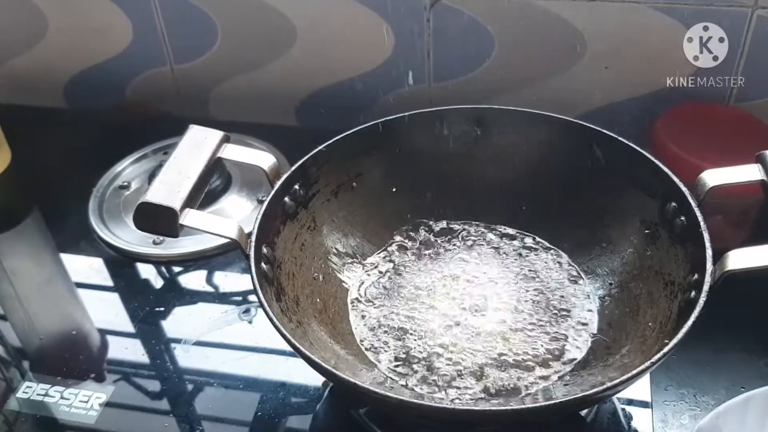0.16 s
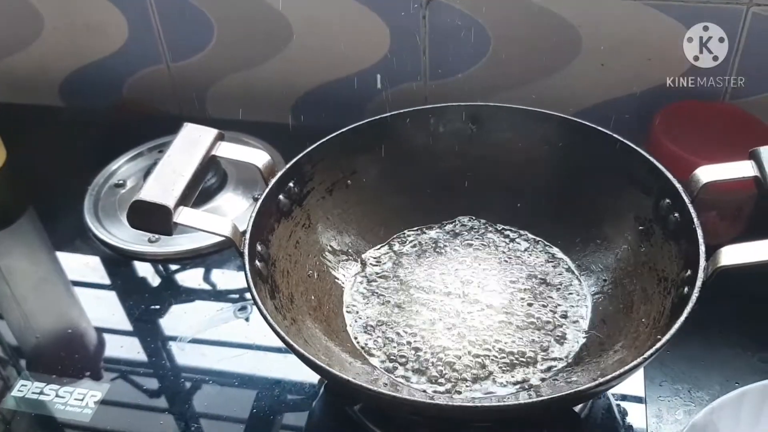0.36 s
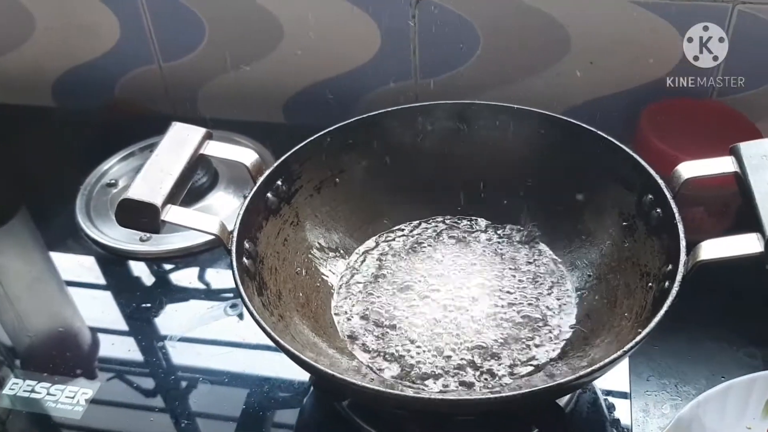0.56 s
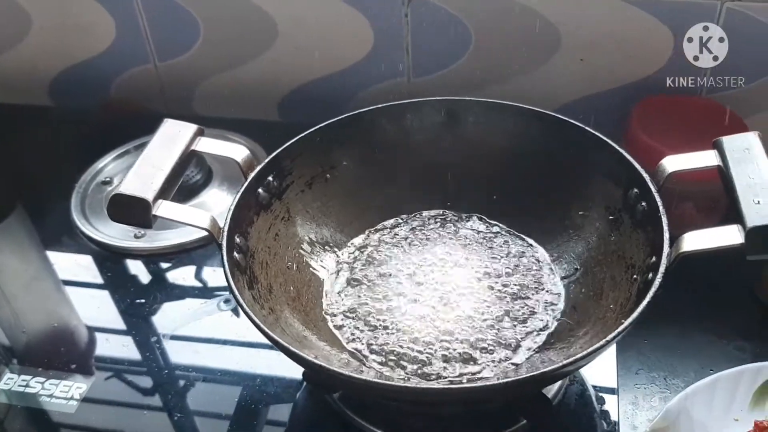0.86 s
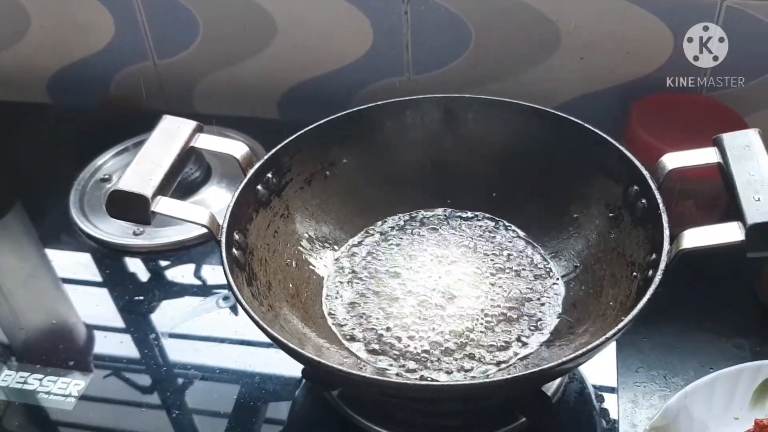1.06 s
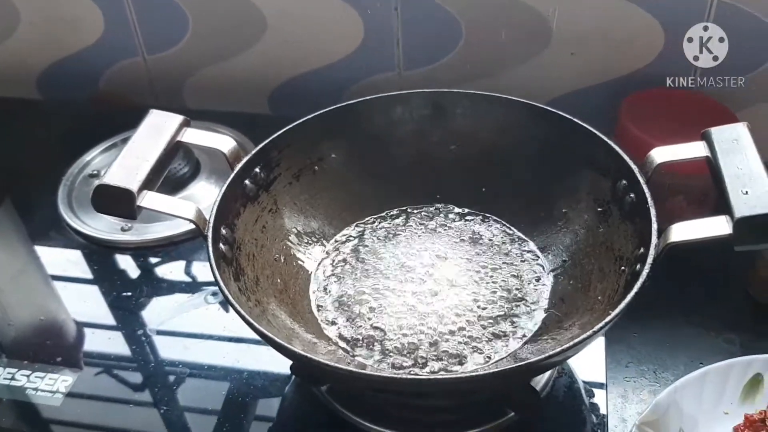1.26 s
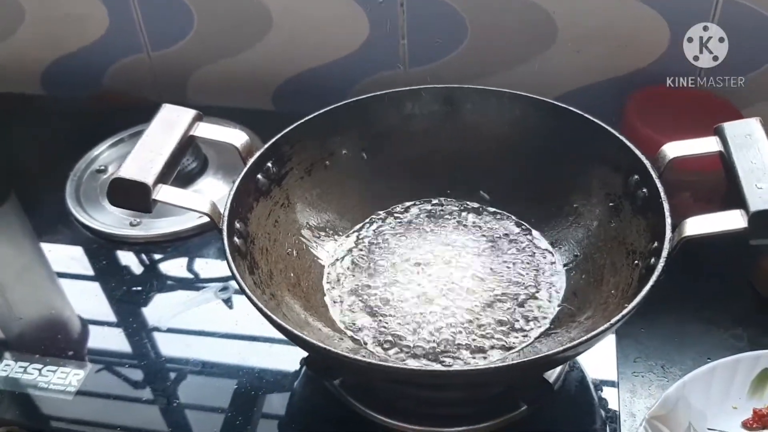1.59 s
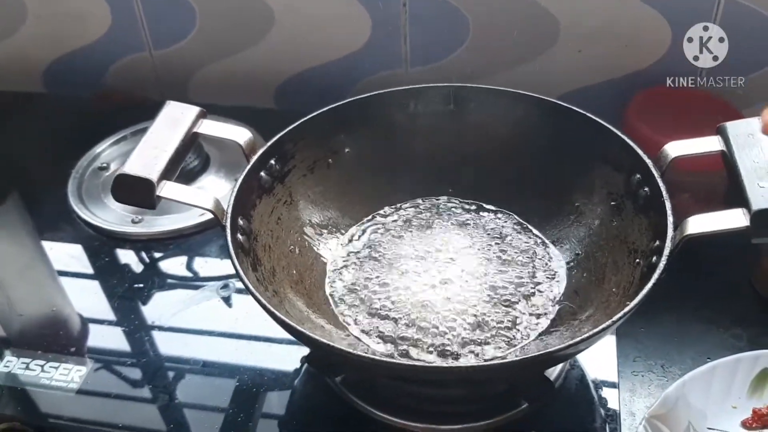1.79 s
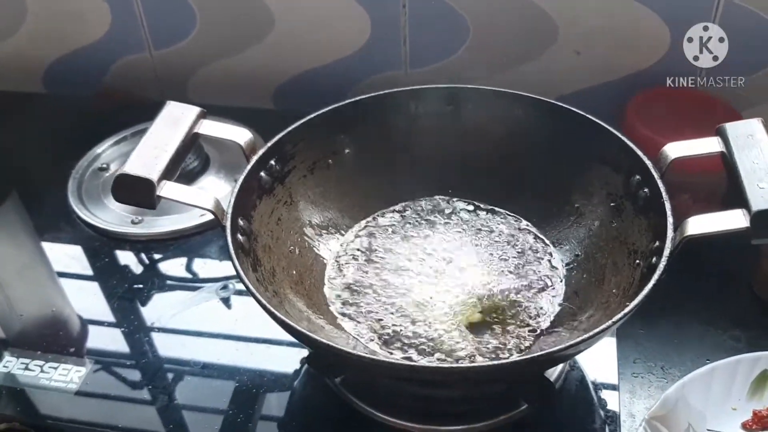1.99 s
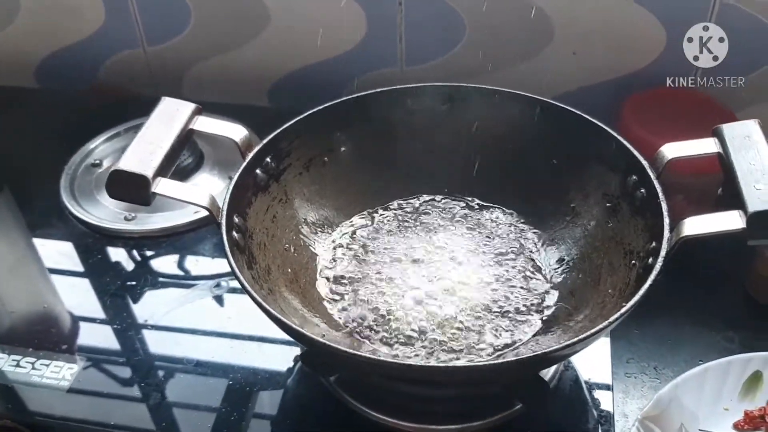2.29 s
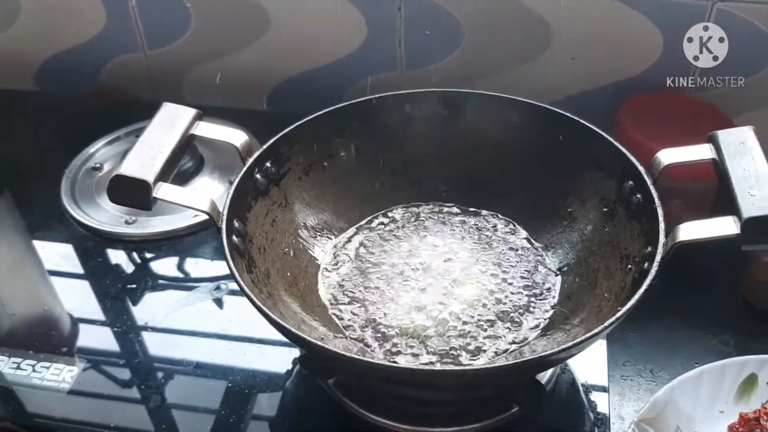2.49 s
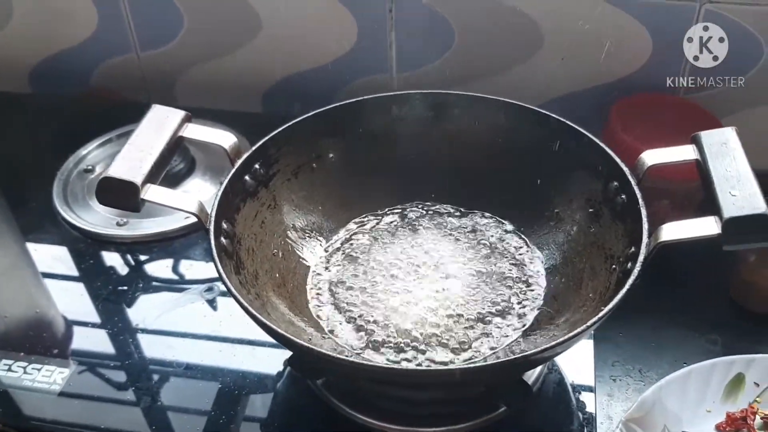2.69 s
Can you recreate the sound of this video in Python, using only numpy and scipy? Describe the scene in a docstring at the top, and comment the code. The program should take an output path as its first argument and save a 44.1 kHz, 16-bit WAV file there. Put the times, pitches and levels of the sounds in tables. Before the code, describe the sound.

Oil sizzles and bubbles in a steel wok close to the microphone, crackling with scattered sharp snaps from start to finish. A gas flame rushes very faintly underneath in a small, slightly echoing kitchen.

```python
"""Hot oil sizzles in a steel wok on a gas ring, heard from close above in a tiled kitchen.
Trapped water flashes to steam in sharp snaps; steam bubbles tear open and resonate for a few cycles,
and countless smaller ones merge into a fizz. Each snap and pop scatters in the bowl and reverberates
in the room, and three hard snaps jolt the microphone. The flame rushes faintly underneath."""
import sys
import numpy as np
from scipy import signal
from scipy.fft import rfft, irfft, next_fast_len
from scipy.io import wavfile

SR = 44100
rng = np.random.default_rng(int(sys.argv[2]) if len(sys.argv) > 2 else 0)


def unload_audio(sound):
    """Save the sound as a 16-bit wav file, at the path given as the first command line argument."""
    columns = np.transpose(np.atleast_2d(sound))
    # keep every value between -1 and 1, then stretch to whole-number steps
    steps = np.round(np.clip(columns, -1, 1) * 32767)
    wavfile.write(sys.argv[1], SR, steps.astype(np.int16))


N = 125685
GRAIN = 1024  # samples in one burst
TREBLE_HZ = 7040
FIZZ_PAN_DB = 1.5


def from_db(db):
    """Amplitude ratio of a level in decibels."""
    return 10 ** (np.asarray(db) / 20)


def rms_one(x):
    """Normalisation to unit mean power."""
    return x / np.sqrt(np.mean(x ** 2) + 1e-20)


def panned(db):
    """Direction by level difference: gains that put the left channel db above the right."""
    return from_db(np.array([[.5], [-.5]]) * db)


def add(out, s, sound):
    """Superposition: a sound joins the mix at s seconds."""
    i = int(np.clip(s * SR, 0, N - 1))
    out[:, i:i + sound.shape[-1]] += sound[..., :N - i]


def gain_at(colour, hz):
    """Spectral envelope, interpolated in decibels over log frequency."""
    corner_hz, db = np.transpose(colour)
    return from_db(np.interp(np.log(hz + 1), np.log(corner_hz), db))


def bins(size):
    """Frequencies in Hz of a real Fourier transform."""
    return np.arange(size // 2 + 1) * SR / size


def minimum_phase(gain):
    """Folding the cepstrum gives the most compact causal click with this spectrum."""
    cepstrum = irfft(np.log(gain + 1e-6))
    half = len(cepstrum) // 2
    cepstrum[1:half] *= 2
    cepstrum[half + 1:] = 0
    return irfft(np.exp(rfft(cepstrum)))


def noise(colour, correlation):
    """Partly coherent stereo noise of unit power, mixed from a common and an opposed part."""
    size = 2 * next_fast_len(N // 2 + 1)
    white = rng.standard_normal((2, size))
    mid, side = irfft(rfft(white) * gain_at(colour, bins(size)))[:, :N]
    return rms_one(np.sqrt(1 + correlation) * mid + np.sqrt(1 - correlation) * side * [[1], [-1]])


def swarm(per_s, spread_db=4.5, range_db=14.5):
    """Independent bursts, mostly weak. Each row: start in seconds, extra dB, pitch deviation."""
    draws = rng.random((int(per_s * N / SR), 4))
    extra_db = np.minimum(-spread_db * np.log(draws[:, 1]), range_db)
    deviation = (draws[:, 2] - draws[:, 3]) * np.sqrt(6)  # triangular, unit variance
    return zip(draws[:, 0] * N / SR, extra_db, deviation)


def vigour_db(s, follow=0.25):
    """A harder boil radiates more: the level follows a fraction of its swing about the mean."""
    # Vigour of the boil. Each row: time in seconds, vigour in dB.
    boil = [(0.0, -41.5), (.66, -38.5), (1.14, -46.5), (1.25, -44), (1.98, -45), (2.11, -32.5),
            (2.36, -46.5)]
    times, db = np.transpose(boil)
    return follow * (np.interp(s, times, db) - db.mean())


def fizz(level_db=-52, flicker_db=5, flickers_per_s=90):
    """Bubbles too small and many to tell apart sum incoherently to a flickering noise."""
    # Spectrum of the fizz. Each row: frequency in Hz, level in dB.
    colour = [(300, -32), (650, -5), (900, -10), (1300, 1.5), (1850, -2), (2400, 4), (3000, 3.5),
              (4200, 3.5), (5800, -3.5), (7200, -5.5), (10000, -18), (15000, -16), (16000, -58)]
    t = np.arange(N) / SR
    flicker = np.interp(t * flickers_per_s, np.arange(N), rng.standard_normal(N))
    envelope = from_db(level_db + vigour_db(t) + flicker_db * flicker)
    return envelope * noise(colour, correlation=0.49) * panned(FIZZ_PAN_DB)


def flame(level_db=-62):
    """The gas flame radiates a steady broadband rush, strongest at low frequencies."""
    # Spectrum of the flame. Each row: frequency in Hz, level in dB.
    colour = [(25, -41), (50, -35), (80, -7), (125, 2.5), (220, -2.5), (420, 3.5), (590, -2), (850, 3),
              (2000, -15.5)]
    return from_db(level_db) * noise(colour, correlation=0.82) * panned(db=1)


def pop(db, hz, rise_cycles, crack_db):
    """Damped cavity resonance: the film tears with a click, and the ring swells and dies away."""
    # Spectrum of the tearing film. Each row: frequency in Hz, level in dB.
    crack_colour = [(300, -57), (950, 4), (1600, -28), (4000, 2.5), (7000, 5), (15000, -11)]
    crack = minimum_phase(gain_at(crack_colour, bins(GRAIN)))
    cycles = np.arange(GRAIN) / SR * hz
    age = cycles / rise_cycles
    ring = (age * np.exp(1 - age)) ** 2 * np.sin(2 * np.pi * cycles)
    return from_db(db) * (ring + from_db(crack_db) * crack)


def bubbles(small_hz=4040, low_hz=1035, mic_move_db_per_s=3):
    """Steam cavities resonate as large pops, a crowd of small ones and a low bubbling near 1 kHz."""
    # Large bubbles. Each row: start in seconds, level in dB, pitch in Hz, cycles to the top of
    # the ring (under 1 a dry crack, 2 a round plip).
    pops = [(.0070, -25, 2646, 0.78), (0.1118, -24, 3140, 1.2), (.1234, -17.5, 4670, 1.6),
            (.1340, -30.5, 2270, 2.9), (.1640, -26.5, 3200, 3.9), (0.167, -30.5, 1550, 2.2),
            (.1697, -27, 3120, 2.8), (.1701, -18.5, 4470, 2.3), (0.1803, -22, 5000, 1.9),
            (0.1793, -24, 2530, 1.9), (0.2164, -24, 4020, 1.3), (.2356, -18, 3270, 1.8),
            (0.2397, -16.5, 3080, 1.23), (0.2579, -16, 2970, 1.5), (0.2656, -25.5, 4500, 3),
            (0.2698, -17, 2843, 0.69), (0.3523, -27, 2690, 2.4), (.4690, -19, 3283, 1.25),
            (.5358, -25, 3656, 0.66), (.5634, -32, 4030, 1.6), (0.6014, -18.5, 3180, 1.34),
            (0.7064, -23, 5700, 1.2), (0.8381, -22, 2130, 1.5), (.8648, -26, 3400, 2.3),
            (.8801, -19.5, 3030, 2.1), (1.0417, -20.5, 3120, 1.45), (1.0700, -16.5, 3030, 1.6),
            (1.1317, -28, 3380, 1.9), (1.1786, -20.5, 3929, 1.5), (1.264, -32, 4300, 3.7),
            (1.2992, -29.5, 2700, 1.15), (1.3322, -23, 2900, 0.82), (1.5306, -21.5, 3430, 0.82),
            (1.6127, -19.5, 2940, 1.13), (1.6198, -18.5, 2930, 0.6), (1.6447, -18, 3850, 1.15),
            (1.7188, -17.5, 3840, 0.49), (1.9063, -36, 3420, 3), (1.9390, -23, 2910, 1.02),
            (1.9897, -18.5, 3950, 1.84), (2.0445, -19.5, 4800, 0.87), (2.0880, -26.5, 2440, 3),
            (2.1355, -29, 3460, 2.4), (2.183, -26, 4960, 1.9), (2.2278, -20, 2910, 2.4),
            (2.2307, -21.5, 3270, 1.06), (2.256, -31, 2190, 1.4), (2.278, -37.5, 1020, 1.6),
            (2.3563, -15.5, 3190, 1.73), (2.4291, -19.5, 2790, 1.95), (2.5402, -19, 4540, 0.63),
            (2.6204, -25.5, 3120, 1.5), (2.6590, -14.5, 4600, 1.2), (2.8220, -23.5, 4160, 1.32)]
    large = [(s, pop(db, hz, cycles, crack_db=0.5)) for s, db, hz, cycles in pops]
    small = [(s, -46 + db + vigour_db(s), small_hz * 2 ** (.36 * deviation))
             for s, db, deviation in swarm(per_s=200)]
    # The low bubbling grows fainter as the microphone moves.
    low = [(s, -58.5 + db - mic_move_db_per_s * s, low_hz * 2 ** (.2 * deviation))
           for s, db, deviation in swarm(per_s=200)]
    # Small bubbles are rounder and lie deeper in the foam: less click, more scattering.
    crowd = [(s, pop(db, hz, rise_cycles=1.57, crack_db=-1.5)) for s, db, hz in small + low]
    return wok(large, pan_db=2, scatter_db=-5) + wok(crowd, pan_db=FIZZ_PAN_DB, scatter_db=-2.5)


def wok(bursts, pan_db, scatter_db, paths_per_s=5000, build_s=.00035, decay_s=.0024, max_lag_s=.00008):
    """Multipath scattering: each burst arrives directly, then by its own bounces in the bowl."""
    out, t, hz = np.zeros((2, N)), np.arange(GRAIN) / SR, bins(2 * GRAIN)
    fade = np.exp(-t / decay_s) * (1 - np.exp(-t / build_s))
    for s, sound in bursts:
        strength, spot = rng.random((2, 2, GRAIN))
        bounces = (strength - .5) * fade * (spot < paths_per_s / SR)
        bounces *= from_db(scatter_db) / np.sqrt(np.sum(bounces ** 2) / 2 + 1e-20)
        lag_s = np.round(spot[:, :1] * max_lag_s * SR) / SR  # direct path to each channel
        paths = np.exp(-2j * np.pi * hz * lag_s) + rfft(bounces, 2 * GRAIN)
        add(out, s, irfft(rfft(sound, 2 * GRAIN) * paths))
    return out * panned(pan_db)


def kitchen(x, level_db=-6.5, low_t60_s=0.22, treble_t60_s=0.32, build_s=0.0022):
    """Reverberation: echoes off the tiles thicken into a diffuse tail whose treble lasts longest."""
    # Spectrum of the echoes. Each row: frequency in Hz, level in dB.
    colour = [(100, -7), (600, -24), (1500, 0.5), (3000, 2.5), (6000, 3.5), (9000, -2.5), (12000, -4.5),
              (16000, -0.5)]
    size, early_echoes_per_s, growth_s = 24000, 1700, .02
    t, hz = np.arange(size) / SR, bins(size)
    density = np.clip(early_echoes_per_s / SR * (1 + (t / growth_s) ** 2), 0, 1)
    echoes = rng.standard_normal((2, size)) * (rng.random((2, size)) < density) / np.sqrt(density)
    spectrum = rfft(echoes) * gain_at(colour, hz)
    low = irfft(spectrum * (hz < TREBLE_HZ)) * from_db(-60 * t / low_t60_s)
    treble = irfft(spectrum * (hz >= TREBLE_HZ)) * from_db(-60 * t / treble_t60_s)
    tail = rms_one((low + treble) * (1 - np.exp(-t / build_s))) / np.sqrt(size)
    return from_db(level_db) * signal.fftconvolve(x, tail, axes=1)[:, :N]


def snap(db, treble_db):
    """Flash boiling: a water drop expands to steam and radiates a single pressure pulse."""
    # Spectrum of the pulse. Each row: frequency in Hz, level in dB.
    colour = [(40, -61), (300, -17.5), (900, -9.5), (2000, -9), (3500, -0.5), (5500, -3), (8500, -1.5),
              (11700, 3), (15000, -3), (16000, -18.5)]
    hz = bins(GRAIN)
    shelf = from_db(treble_db * hz ** 4 / (hz ** 4 + TREBLE_HZ ** 4))
    return from_db(db) * minimum_phase(gain_at(colour, hz) * shelf)


def spatter():
    """Loud snaps and faint ticks, as heard directly and as sent to the room, which escapes shadowing."""
    # Bursting drops. Each row: start in seconds, level in dB, treble shelf in dB, gain in dB of
    # the direct path, which the bowl may shade.
    drops = [(.1184, -2, -1.5, 4.5), (.1266, -3, 4, -5), (.1455, 6, 4, -5), (.2088, 0.5, -1, -5.5),
             (.2758, 1, -4.5, -4), (.4605, -7, 5, 1.5), (.4745, -5, 9.5, -1), (.6023, 0, 6, 2),
             (.6035, 2, 3, -4.5), (.6143, -3, 3, 2.5), (.6197, -5.5, -3, 2.5), (.7912, -10, -1, -5),
             (.8284, 0.5, -7.5, -8.5), (1.0399, -1, -5.5, -4), (1.1790, -7.5, -0.5, -6),
             (1.4502, -2.5, 6, 1), (1.5102, -10, -1.5, -1.5), (1.6131, 2, 3.5, 0.5), (1.9392, -15, 0, 0.5),
             (1.9897, 0, -1, -13.5), (2.0589, 3.5, 3.5, -4.5), (2.0778, -6.5, 6.5, 2),
             (2.2200, -1, -7.5, -7), (2.3414, -3, 5, -0.5), (2.3907, 0.5, -5.5, -7.5),
             (2.6060, -1.5, -10, -6.5), (2.6320, -1.5, -4.5, -2.5)]
    ticks = [(s, -34 + db, -2, -3) for s, db, _ in swarm(per_s=14)]  # same columns
    rows = list(drops) + ticks
    direct = [(s, snap(db + direct_db, treble_db)) for s, db, treble_db, direct_db in rows]
    to_room = [(s, snap(db, treble_db)) for s, db, treble_db, _ in rows]
    return [wok(bursts, pan_db=0.5, scatter_db=-4) for bursts in (direct, to_room)]


def jolts(knock_hz=497, knock_s=0.00027, swing_s=0.00066, swing_lag_s=0.00019, low_cut_hz=97):
    """Shock response: a knock displaces the microphone, and its two sides swing back opposite ways."""
    # Bursts that jolt the microphone. Each row: start in seconds, swing gain in dB, knock gain in dB.
    shocks = [(0.1454, -10, -19.5), (0.4739, -16.5, -22.5), (1.6132, -3, -7)]
    out, t = np.zeros((2, N)), np.arange(GRAIN) / SR
    knock = np.exp(-t / knock_s) * np.cos(2 * np.pi * knock_hz * t)
    swing = np.exp(-t / swing_s) * (1 - np.exp(-t / .00008)) * panned(db=4.5) * [[-1], [1]]
    for s, swing_db, knock_db in shocks:
        add(out, s, from_db(knock_db) * knock)
        add(out, s + swing_lag_s, from_db(swing_db) * swing)
    low_cut = signal.butter(2, low_cut_hz, "high", fs=SR, output="sos")
    return signal.sosfilt(low_cut, out + 1e-18)


def scene():
    """The direct sound of the oil and its reverberant field superpose over the flame."""
    bed = flame() + fizz()
    snaps, snaps_to_room = spatter()
    pops = bubbles()
    room = kitchen(from_db(-1) * pops + snaps_to_room)  # bubbles sit low in the oil and send out less
    return bed + pops + snaps + room + jolts()


def record(dry, ceiling=0.8, stopband_hz=16300):
    """Soft saturation rounds the hardest peaks, and a steep low-pass limits the bandwidth."""
    low_pass = signal.cheby2(16, 70, stopband_hz, fs=SR, output="sos")
    return signal.sosfilt(low_pass, ceiling * np.tanh(dry / ceiling))


dry = scene()
out = record(dry)
unload_audio(out)
```